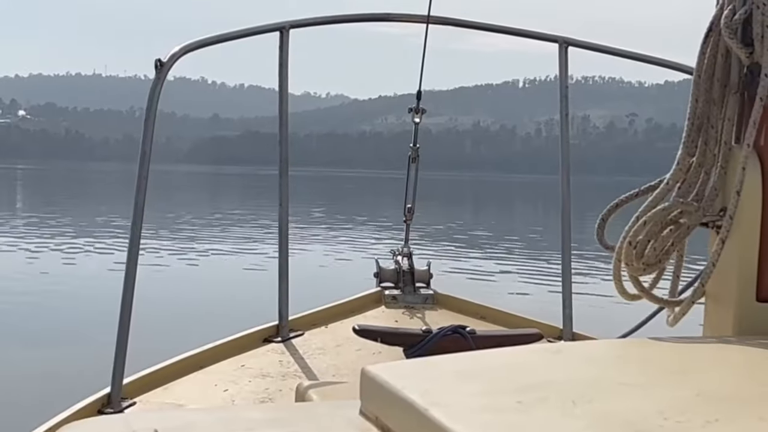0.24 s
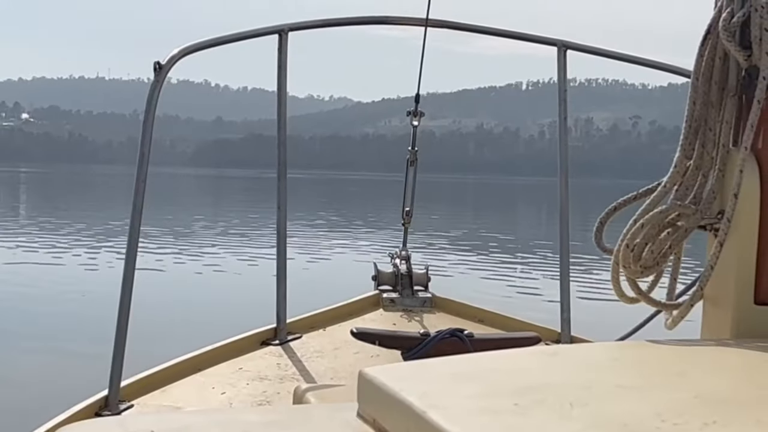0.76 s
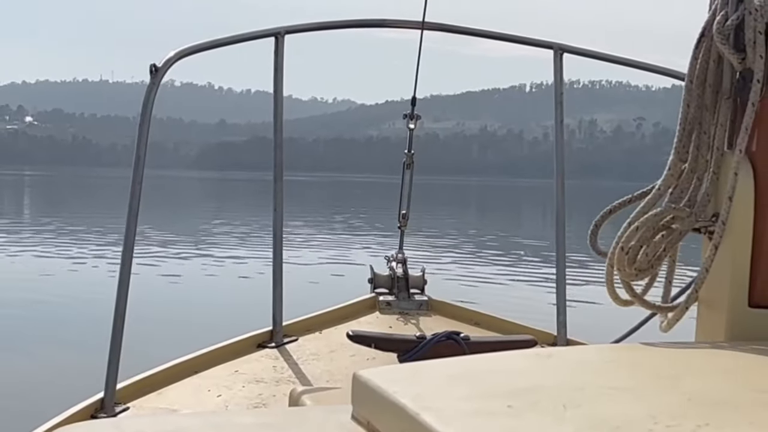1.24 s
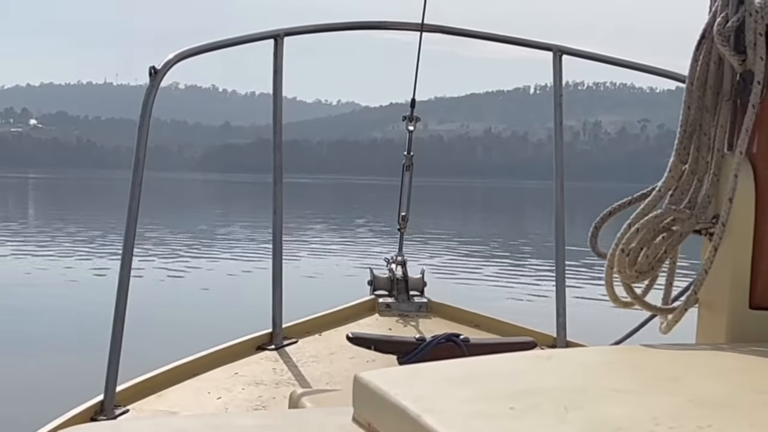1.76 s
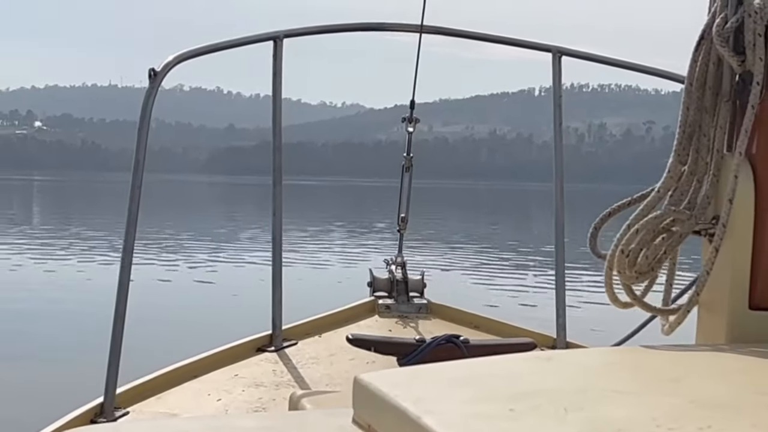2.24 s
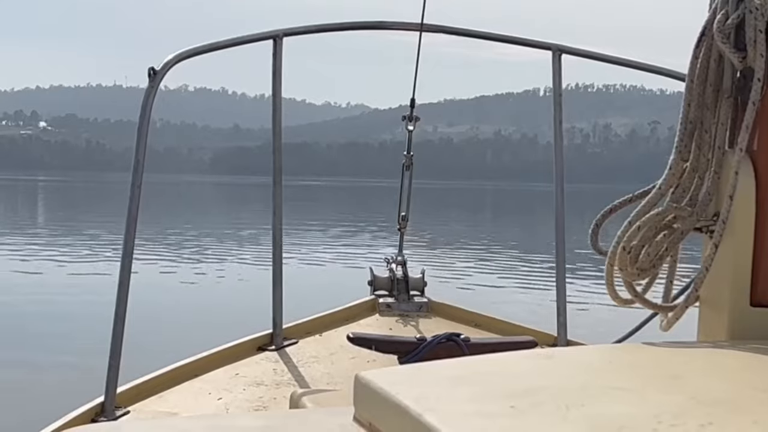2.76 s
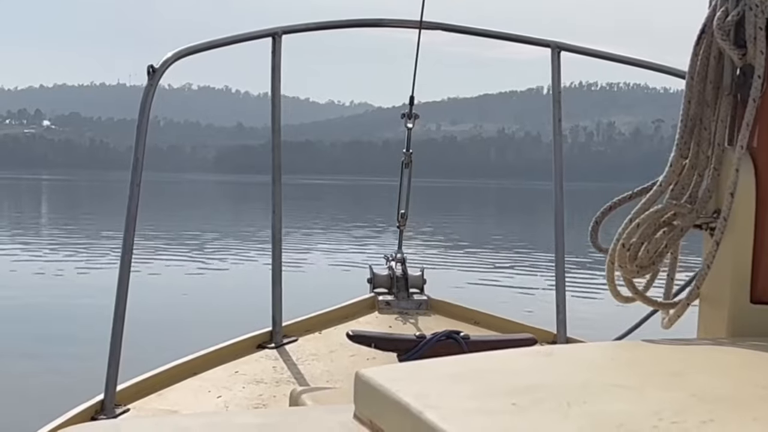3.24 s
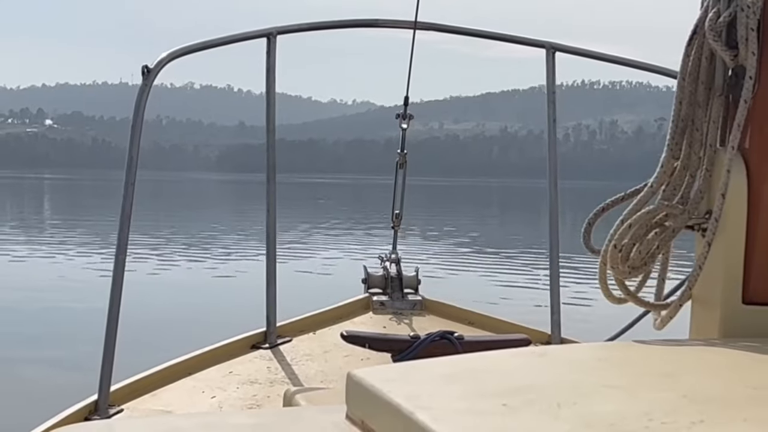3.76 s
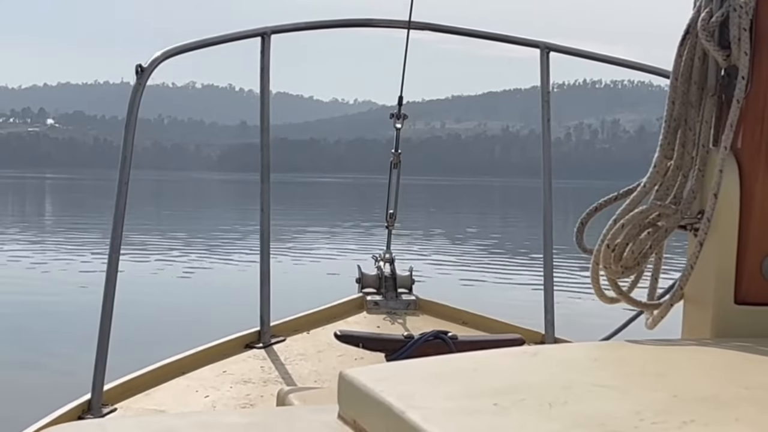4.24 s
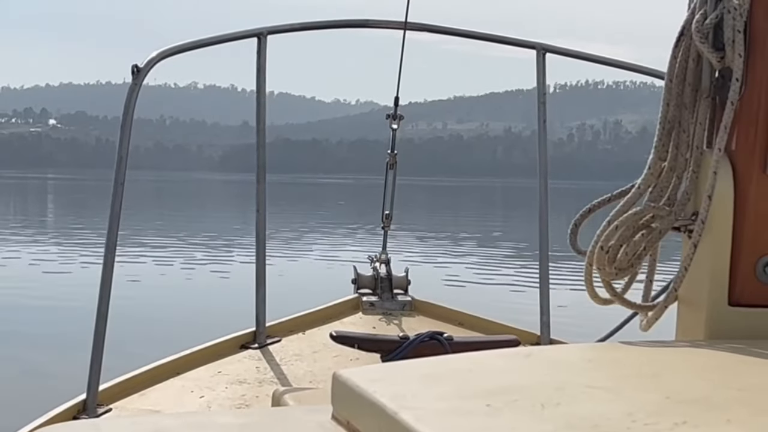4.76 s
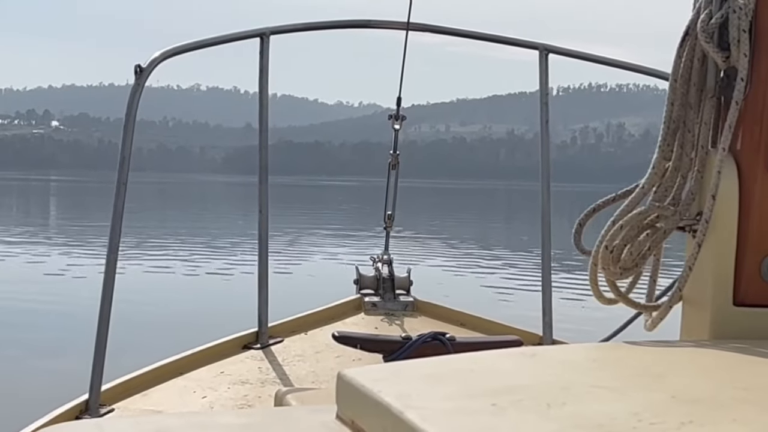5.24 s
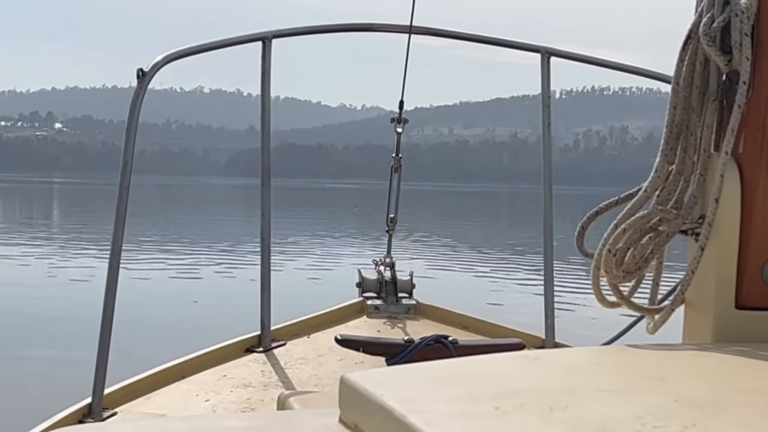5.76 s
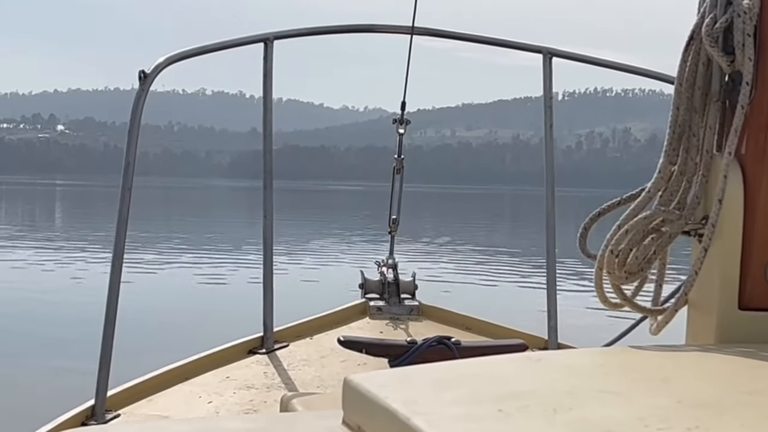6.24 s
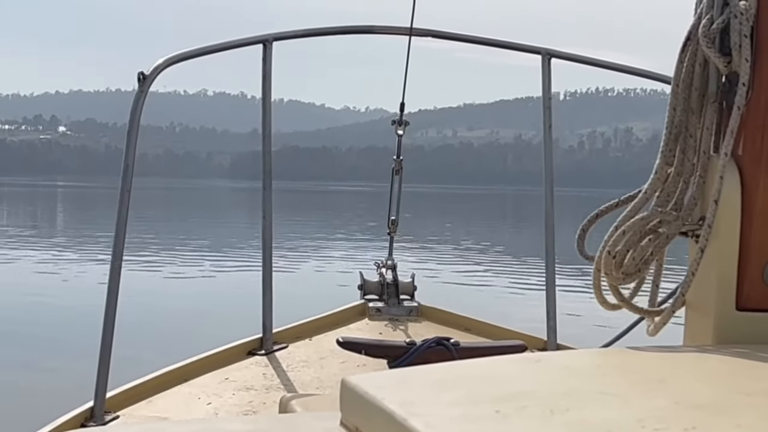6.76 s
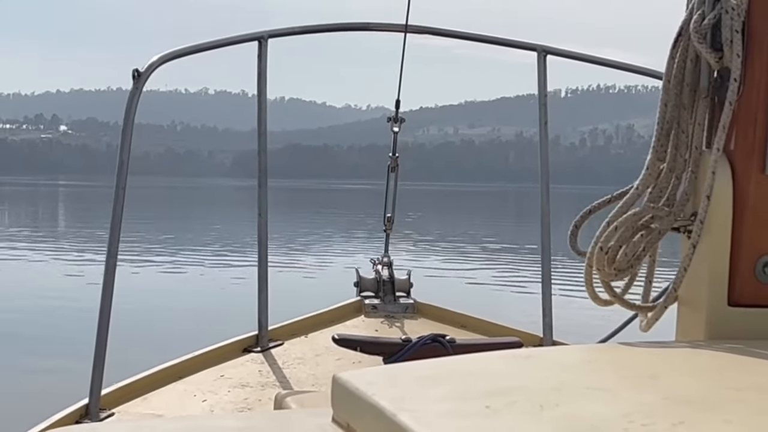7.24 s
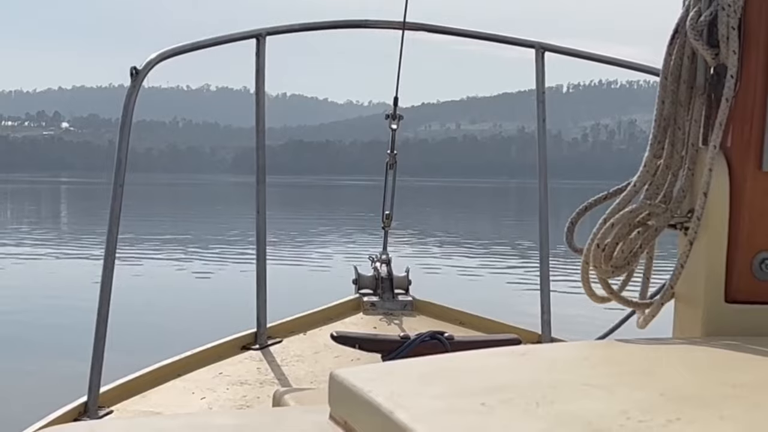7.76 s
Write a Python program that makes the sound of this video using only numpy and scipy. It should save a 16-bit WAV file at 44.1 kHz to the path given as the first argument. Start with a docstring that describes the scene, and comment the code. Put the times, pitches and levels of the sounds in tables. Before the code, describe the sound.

A single-cylinder diesel engine in a small boat fades in quickly and runs with a fast, even knocking throb and light valve ticking, heard from the foredeck on calm water. A low rumble swells through the hull, with irregular thuds, hollow knocks and a few faint metal clinks. Soft water wash fills the gaps, and everything fades out near the end.

```python
"""A low rumble and a quick knocking fade in: a one-cylinder diesel in a small boat, heard from the foredeck.
Valves, injector and piston strike at fixed crank angles, and each impact excites damped resonances. The
propeller shaft turns at its own speed, so gears and mounts knock hardest when crank and shaft line up. The
shaft's heaviest blows, hollow knocks and clinks come at irregular times; wash fills the gaps, and all fades
out."""
import sys
import numpy as np
from scipy import signal
from scipy.fft import rfft, irfft, next_fast_len
from scipy.io import wavfile
from scipy.ndimage import uniform_filter1d, map_coordinates

SR = 44100
rng = np.random.default_rng(int(sys.argv[2]) if len(sys.argv) > 2 else 0)


def master_out(mix):
    """Clip the mix to full scale and print it as 16-bit PCM to the path in sys.argv[1]."""
    frames = np.transpose(np.atleast_2d(mix))
    ceiling = np.clip(frames, -1, 1)
    pcm = np.round(ceiling * 32767).astype(np.int16)
    wavfile.write(sys.argv[1], SR, pcm)


N = 353204
TIME = np.arange(N) / SR
CYCLE_HZ, SHAFT_HZ = 10.3355, 13.457  # working cycles of the engine, turns of the propeller shaft


def amp(db):
    """Amplitude ratio of a level in dB."""
    return 10 ** (np.asarray(db) / 20)


def unit(x):
    """Normalisation to rms 1."""
    return x / np.sqrt(np.mean(x ** 2))


def along(points, x):
    """Linear interpolation between (x, value) points."""
    return np.interp(x, *np.transpose(points))


def wobble(knot_hz):
    """Random modulation: a spline through Gaussian knots."""
    knots = rng.standard_normal(int(N * knot_hz / SR) + 4)
    return map_coordinates(knots, [TIME * knot_hz])


def swell(hz, peak_angle):
    """Periodic modulation: a cosine that peaks at an angle given in turns."""
    return np.cos(2 * np.pi * (TIME * hz - peak_angle))


def filtered(x, response):
    """Linear filtering: the spectrum of x times a frequency response."""
    size = next_fast_len(N + 8192)
    return irfft(rfft(x, size) * response(np.fft.rfftfreq(size, 1 / SR)), size)[..., :N]


def noise(spectrum):
    """Spectral shaping of two independent noises on a log frequency axis, to rms 1."""
    corners, db = np.transpose(spectrum)
    shape = lambda hz: amp(np.interp(np.log(hz + 1), np.log(corners), db, -120))
    return unit(filtered(rng.standard_normal((2, N)), shape))


def ring(times, db, decay, hz, width):
    """Damped resonance under impacts: a narrow band sounds a tone, a wide one a burst of noise."""
    onsets = np.clip(times * SR, 0, N - 1).astype(int)
    impulses = np.bincount(onsets, amp(db) * (times > 0), N)
    fall = np.exp(-1 / (decay * SR))
    rise = np.exp(-2.2 / (1 + hz / 9000) / (decay * SR))
    envelope = signal.lfilter([1 - rise], np.convolve([1, -fall], [1, -rise]), impulses)
    detune = .13 * width * rng.standard_normal(len(times) + 1)
    latest = np.searchsorted(np.sort(onsets), np.arange(N), "right")
    phase = 2 * np.pi * rng.random(len(times) + 1)[latest]
    tone = np.sqrt(2) * np.sin(2 * np.pi * (hz + detune[latest]) * TIME + phase) * [[1], [.5]]
    tonal = np.exp(-width / 1700)
    hiss = rng.standard_normal((2, N)) / np.sqrt(2 * width / SR)
    edges = [hz - width / 2, min(hz + width / 2, SR / 2 - 1)]
    band = signal.butter(2, edges, "band", fs=SR, output="sos")
    return signal.sosfilt(band, envelope * (tonal * tone + np.sqrt(1 - tonal ** 2) * hiss))


def struck(events, modes):
    """Modal superposition: each impact excites every mode of the body."""
    times, db = np.transpose(events)
    return sum(ring(times + delay, db + gain, decay, hz, width) for delay, decay, hz, width, gain in modes)


def knocks(table, own_hz, other_hz, scatter_db, jitter_s):
    """Periodic impacts; gated ones weaken when the other rotation is out of reach of a set angle."""
    out = np.zeros((2, N))
    turns = np.arange(-1, int(N / SR * own_hz))
    for angle, db, decay, hz, width, *gate in table:
        loss_db, other_angle, reach = gate or (0, 0, 0)
        late, loud = rng.standard_normal((len(turns), 2)).T
        times = (turns + angle) / own_hz + jitter_s * late
        apart = np.abs((times * other_hz - other_angle + .5) % 1 - .5)
        missed = (1 + np.tanh((apart - reach) / 0.018)) / 2
        scatter = scatter_db / (1 + hz / 4000) * loud  # low notes vary most
        out += ring(times, db - loss_db * missed + scatter, decay, hz, width)
    return out


def wash():
    """Broadband noise of block vibration and water along the hull, modulated by the engine cycle."""
    # noise spectrum: (frequency [Hz], relative density [dB])
    spectrum = [(90, -39), (170, 2), (230, -6), (400, -12.5), (800, -19), (1000, -22), (1550, -24),
                (2000, -26), (3200, -30), (5100, -33.5), (7200, -42.5), (9500, -42.5), (14300, -52.5),
                (15500, -28)]
    return amp(13 + 1.6 * swell(CYCLE_HZ, .7) + 0.58 * wobble(14)) * noise(spectrum)


def rumble():
    """Forced vibration: the hull drones under the engine mounts and surges out of brief lulls."""
    # hull spectrum: (frequency [Hz], relative density [dB])
    spectrum = [(18, -36.5), (28, -11), (40, 2.5), (51, 7.5), (64, 10.5), (100, 4), (140, 0.5), (200, -16),
                (300, -53)]
    # slow course of the drone: (time [s], level [dB])
    course = [(0.0, -28), (0.2, -19), (0.9, -18.5), (1.5, -16.5), (2.2, -21), (3.2, -19.5), (3.9, -20),
              (4.5, -18.5), (5.3, -19), (5.8, -21.5), (6.15, -16), (6.8, -23), (7.2, -23), (7.8, -24),
              (8.01, -34)]
    # its strongest surges: (time [s], boost [dB])
    surges = [(0.78, 7), (1.05, 4), (1.45, 1), (2.0, 4), (2.7, 4.5), (2.97, 5), (3.08, 1), (3.25, 3.5),
              (4.01, 3), (4.32, 4.5), (4.54, 8), (4.84, 7), (5.2, 4.5), (5.49, 8), (6.07, 6), (6.47, 1),
              (7.0, 8), (7.09, 9.5)]
    drone = noise(spectrum)
    power = np.abs(uniform_filter1d(uniform_filter1d(drone[0] ** 2, size=900), size=900))
    evened = unit(drone / (power + .1) ** .15)
    bell = lambda centre, half_s: np.exp(-((TIME - centre) / half_s) ** 2)
    surge_db = sum(db * (1.4 * bell(time, 0.03) - 0.4 * bell(time, 0.058)) for time, db in surges)
    throb_db = 1.8 * swell(SHAFT_HZ, .52) + 1.2 * swell(CYCLE_HZ, .6)
    return amp(along(course, TIME) + surge_db + throb_db + 1.5 * wobble(13)) * evened


def clinks():
    """Free vibration of a loose metal fitting in one narrow mode."""
    # impacts: (time [s], level [dB])
    impacts = [(0.9588, -35), (1.7276, -31), (1.9735, -27), (2.1471, -32), (2.3377, -37), (2.5532, -25.5),
               (2.9393, -35), (3.519, -24), (5.077, -32), (5.9211, -35), (6.2104, -28), (6.4304, -33),
               (6.7157, -29), (6.8544, -27)]
    # its ring: (delay [s], decay [s], frequency [Hz], bandwidth [Hz], gain [dB])
    modes = [(-0.01, 0.0073, 1860, 110, 0.84)]
    return struck(impacts, modes)


def hollow_knocks():
    """Heavily damped resonances answer between the chugs with a hollow note."""
    # impacts: (time [s], level [dB])
    impacts = [(0.084, -30), (0.125, -25), (0.192, -23), (0.338, -26), (0.504, -18), (0.602, -25),
               (0.632, -19), (0.795, -18.5), (0.92, -22), (1.087, -17.5), (1.335, -23), (1.378, -22),
               (1.47, -17.5), (1.758, -20), (2.051, -17), (2.3, -23.5), (2.56, -19), (2.586, -25),
               (2.725, -18), (2.855, -22), (2.982, -23), (3.017, -18), (3.234, -25), (3.26, -25),
               (3.309, -26), (3.527, -25), (3.56, -31), (3.694, -17.5), (3.822, -25), (3.968, -24),
               (3.983, -19), (4.277, -19), (4.373, -21), (4.568, -22), (4.662, -18.5), (4.789, -21),
               (4.952, -19), (5.212, -24), (5.246, -20.5), (5.494, -24.5), (5.629, -17.5), (5.755, -22),
               (5.919, -15.5), (6.053, -22), (6.076, -27), (6.174, -31), (6.211, -17), (6.37, -27),
               (6.461, -29), (6.723, -22), (6.754, -25), (6.874, -21), (6.89, -21), (7.178, -21),
               (7.473, -28), (7.857, -25.5)]
    # note and rough edge: (delay [s], decay [s], frequency [Hz], bandwidth [Hz], gain [dB])
    modes = [(-.006, .0105, 577, 150, 2), (-.005, .011, 620, 420, -3)]
    return struck(impacts, modes)


def shaft_blows():
    """Impact excitation: the hardest blows of the drive shaft thud heavily, and bright ones shake loose
    fittings."""
    # blows: (time [s], thud level [dB], knock boost [dB], brightness [dB])
    blows = [(0.11, -12, 6, 8), (0.14, -20, 17, -8), (0.335, -21, 15, 0), (0.364, -9.5, 1, -8),
             (0.441, -13.5, -8, -10), (0.516, -8.5, -15, -10), (0.574, -13, -8, -8), (0.63, -3.5, -3, 1),
             (0.683, -11, -6, -8), (0.927, -2.5, 2.5, -7), (1.084, -12, -7, -8), (1.175, -21.5, 14, -4),
             (1.208, -19, 13, -4), (1.3, -6.5, -7, 2), (1.501, -14, -8, -8), (1.593, -5.5, 2, 3.5),
             (1.755, -4.5, -3, 6.5), (1.89, -6.5, 1.5, -16), (1.933, -9, -8, -10), (2.185, -9, -9, 2),
             (2.268, -6.5, -12, -4), (2.556, -7, 4, 0), (2.723, -15.5, 14, 9), (2.858, -5.5, 3, 3),
             (2.995, -17, -6, -6), (3.017, -17, 14, 13), (3.14, -17, 9, -4), (3.232, -14, -4, -8),
             (3.345, -14.5, -9, -12), (3.382, -20, 8, -6), (3.442, -10.5, -4, -6.5), (3.523, -10, 8, 8),
             (3.815, -8.5, 7, 8.5), (3.843, -6.5, -6, -10), (3.904, -12, -8, -8), (3.979, -17.5, 16, 14.5),
             (4.108, -8, 4.5, 2), (4.208, -19, 7, -6), (4.268, -8, 3, 6), (4.404, -8, -8, -7),
             (4.488, -7, 5, 5), (4.658, -12, -1, -8), (4.793, -9.5, 6, 5), (4.843, -11, -6, -8),
             (4.883, -7, 14.5, -10), (5.082, -10, 6, 4), (5.277, -22, 11, -6), (5.369, -19, 15, -4),
             (5.459, -7.5, 1, 0), (5.515, -9.5, 5, 3), (5.629, -9.5, -9, -8), (5.756, -6, 0, -5),
             (5.891, -11.5, -7, -10), (5.906, -19, 15.5, -4), (6.052, -10.5, 10, 5), (6.204, -10, 3, -8),
             (6.347, -5.5, -1, 1.5), (6.429, -5.5, -4, -15), (6.632, -8.5, -9, -8), (6.689, -13, -4, -8),
             (6.722, -6.5, -1, -1), (6.744, -8.5, 3, -11), (6.865, -17, -8, -2), (6.889, -9.5, 1, -8),
             (7.023, -8, 7.5, 2), (7.184, -19.5, 13, -4), (7.368, -22, 12.5, -6), (7.603, -11, -13, -10),
             (7.687, -15, 2, 7), (7.713, -21.5, 11, -6)]
    # thud, knock, rattle and bite: (delay [s], decay [s], frequency [Hz], bandwidth [Hz], gain [dB],
    # knock weight [1], brightness weight [1])
    modes = [(-.008, .0085, 190, 130, 0, 0, 0), (-.005, .007, 320, 170, -11, 1, 0),
             (-.004, .014, 800, 700, -21, 0, 1.1), (-.004, .009, 2000, 900, -25, 0, .8)]
    times, thud_db, knock_db, bright_db = np.transpose(blows)
    return sum(ring(times + delay, thud_db + gain + knock * knock_db + bright * bright_db, decay, hz, width)
               for delay, decay, hz, width, gain, knock, bright in modes)


def shaft_thumps():
    """Beating of two rotations: the shaft thumps every turn, hardest when the crank lines up."""
    # thumps: (shaft angle [turns], relative level [dB], decay [s], frequency [Hz], bandwidth [Hz],
    # loss out of reach [dB], crank angle [cycles], reach [turns])
    thumps = [(.30, 18.5, 0.01, 209.8, 81, 15, 0.37, 0.18),
              (0.32, 25.5, 0.0056, 110.2, 59.9, 4, 0.41, 0.246)]
    return knocks(thumps, SHAFT_HZ, CYCLE_HZ, scatter_db=3.5, jitter_s=0.0031)


def engine_hum():
    """Periodic forces give harmonics of the cycle, each wavering in level and phase."""
    # rocking of the block: (harmonic [1], relative level [dB])
    rocking = [(3, -4), (4, 10), (5, -3), (6, 10)]
    # firing: (harmonic [1], relative level [dB])
    firing = [(8, 3), (9, 3), (10, -2), (11, -1.5), (14, -4), (16, 3.5), (18, -4.5), (46, -7.5), (47, -9),
              (90, -17.5), (95, -12.5), (97, -14), (103, -20)]
    hum = np.zeros((2, N))
    for harmonics, peak_angle in (rocking, .85), (firing, .58):
        crank = 2 * np.pi * (TIME * CYCLE_HZ - peak_angle)
        for order, db in harmonics:
            hum[0] += amp(db + 3.14 * wobble(4)) * np.cos(order * crank + .5 * wobble(2.573))
    return hum * np.sqrt(2)


def valve_seatings(scatter_db, jitter_s, pitch_spread):
    """Downward chirps, twice a cycle: the note slides as a valve settles."""
    # seatings: (crank angle [cycles], relative level [dB], length [s], start pitch [Hz], end pitch [Hz])
    seatings = [(0.79, 10, 0.016, 1200, 910), (0.35, 5.5, 0.012, 1170, 960)]
    out = np.zeros(N + SR)
    for angle, db, length, first_hz, last_hz in seatings:
        progress = np.linspace(0, 1, int(length * SR))
        glide_hz = first_hz + (last_hz - first_hz) * progress
        for cycle in range(int(N / SR * CYCLE_HZ)):
            late, loud, pitch, phase = rng.standard_normal(4)
            periods = np.cumsum(glide_hz) * (1 + pitch_spread * pitch) / SR
            chirp = np.sin(np.pi * progress) * np.sin(2 * np.pi * periods + phase)
            onset = int(((cycle + angle) / CYCLE_HZ + jitter_s * late) * SR)
            out[onset:onset + len(chirp)] += amp(db + scatter_db * loud) * chirp
    return out[:N] * [[1], [.5]]


def engine_knocks():
    """Impact trains locked to the crank: valve gear, injector, and backlash in gears and mounts."""
    # valve gear and injector:
    # (crank angle [cycles], relative level [dB], decay [s], frequency [Hz], bandwidth [Hz])
    valves = [(0.31, 0.5, 0.0091, 4460, 2230), (0.6, 3, 0.0066, 5050, 1400), (.72, -9, 0.0036, 5100, 1700),
              (0.81, -1.5, 0.013, 5300, 1700), (0.33, -11, 0.01, 11600, 8100),
              (0.57, -2.5, 0.013, 11600, 9100), (0.81, -0.5, 0.0078, 7600, 7800),
              (0.34, -3, 0.012, 2980, 500), (0.59, -2.5, 0.009, 2990, 620), (0.81, 0, 0.0046, 2970, 680),
              (0.24, 2, 0.015, 1900, 500), (0.36, -0.5, 0.0048, 2150, 300), (0.83, -1.5, 0.0027, 2250, 500),
              (0.92, 5, 0.0072, 2050, 850), (0.93, 10, 0.0066, 870, 200), (0.54, 3, 0.0053, 1000, 430),
              (0.9, -1, 0.0039, 1280, 250), (0.93, 8, 0.0081, 1270, 280), (.49, 16, 0.0052, 190, 110),
              (0.61, 22, 0.013, 43, 30.6)]
    # backlash: the same columns, then (loss out of reach [dB], shaft angle [turns], reach [turns])
    contacts = [(0.11, 7.5, 0.0088, 1900, 1300, 5, 0.53, 0.15),
                (0.47, 12.5, 0.0079, 1100, 750, 31, 0.42, 0.162),
                (0.82, 16.5, 0.0093, 560, 240, 25, 0.92, 0.23), (.40, 11.5, 0.02, 250, 260, 18, 0.32, 0.2),
                (0.69, 14.5, 0.018, 370, 290, 40, 0.65, 0.153),
                (0.14, 11.5, 0.0072, 360, 170, 5, 0.59, 0.17), (0.7, 21, 0.0079, 180, 67, 17, 0.8, 0.19)]
    return knocks(valves + contacts, CYCLE_HZ, SHAFT_HZ, scatter_db=1.5, jitter_s=0.0014)


def block_response(hz):
    """Modal response: the engine block reinforces whatever shakes it near its resonances."""
    # block modes: (frequency [Hz], bandwidth [Hz], gain [dB])
    modes = [(488, 5, 2.5), (587, 92, 0.5), (936, 27, 5), (1100, 23, 2.5), (1215, 20, 4.5), (1334, 11.5, 6),
             (1765, 120, 1.5), (2146, 50, 3.5), (2240, 21, 1), (2530, 16, 5), (2757, 14, 5.5),
             (2945, 30, 7.5), (3190, 31, 7), (3390, 32, 3.5), (3714, 32, 5), (3980, 28, 5), (4160, 23, 7),
             (4500, 31, 1), (4690, 79, 4), (4980, 33, 5.5), (5040, 35, 5.5), (5550, 35, 4), (5770, 24, 6.5)]
    return 1 + sum((amp(db) - 1) * 1j * hz * width / (centre ** 2 - hz ** 2 + 1j * hz * width)
                   for centre, width, db in modes)


def scene():
    """Superposition of engine and hull, as two signals to be mixed into left and right."""
    # loudness of the engine: (time [s], gain [dB])
    course = [(0.0, -41.5), (0.09, -39.5), (0.6, -35.5), (1.76, -35), (1.83, -37.5), (2.6, -37),
              (6.91, -36), (7.3, -40), (8.01, -46)]
    impacts = engine_knocks()
    shaft = shaft_thumps()
    hum = engine_hum()
    seatings = valve_seatings(scatter_db=1.0, jitter_s=0.001045, pitch_spread=0.024)
    block = filtered(impacts + seatings + wash(), block_response)
    engine = amp(along(course, TIME)) * (block + shaft + hum)
    return engine + shaft_blows() + hollow_knocks() + clinks() + rumble()


def stereo_image(hz):
    """Stereo image: left-right likeness, stepped phase offset and level balance by frequency."""
    # likeness of left and right: (frequency [Hz], likeness [0-1])
    likeness = [(0, 1), (260, 0.8), (775, 0.14), (1030, 0.91), (1400, 0.18), (2100, 0.8), (3100, 0.96),
                (3800, 1), (5100, 1), (5500, 0.78), (7400, 0.86), (8200, 1), (8850, 1), (9100, 0.7),
                (10800, 0.1), (11300, 0.67), (12300, .999), (13200, 1), (14400, 0.95), (15100, .999)]
    # level balance: (frequency [Hz], left over right [dB])
    balance = [(0, 0), (200, -.6), (500, -3.2), (900, -6), (1900, -6), (2600, -2), (3400, 0), (16000, 0)]
    # stepped phase offset: (frequency [Hz], right minus left [turns])
    offset = [(0, 0), (500, .11), (1050, .15), (1550, .39), (1800, .93), (3350, .93), (3700, 1), (5200, 1),
              (5600, 1.15), (6700, 1.16), (8200, 1.5), (8850, 1.5), (10900, 1.88), (11200, 2), (12400, 2),
              (14400, 2.36), (14800, 2.5), (16000, 2.5)]
    blend = np.arccos(np.clip(along(likeness, hz), 0, 1)) / 2
    tilt = amp(along(balance, hz) / 2) * np.exp(-1j * np.pi * along(offset, hz))
    return np.array([[np.cos(blend) * tilt, np.sin(blend) * tilt],
                     [np.cos(blend) / tilt, -np.sin(blend) / tilt]])


def record(dry):
    """Stereo mixing, soft saturation near full scale and a 15 kHz band limit."""
    stereo = filtered(dry[None], stereo_image).sum(axis=1)
    saturated = stereo / (1 + np.abs(stereo) ** 12) ** (1 / 12)
    return filtered(saturated, lambda hz: hz < 15000)


dry = scene()
out = record(dry)
master_out(out)
```